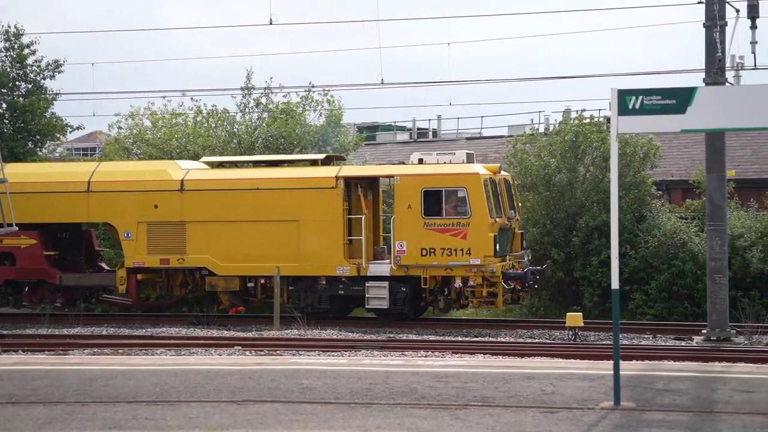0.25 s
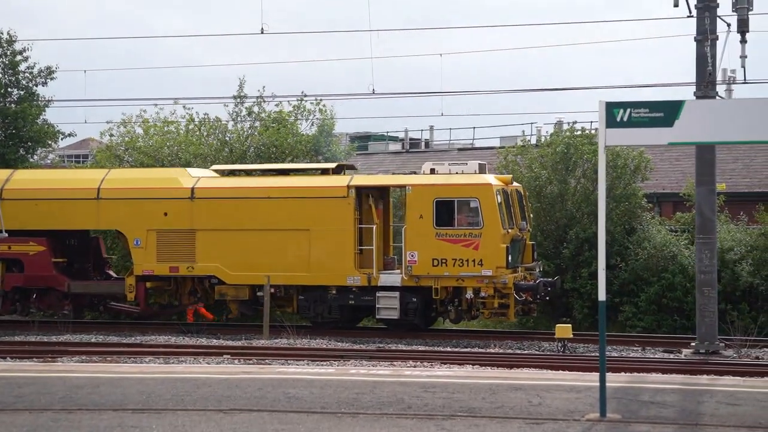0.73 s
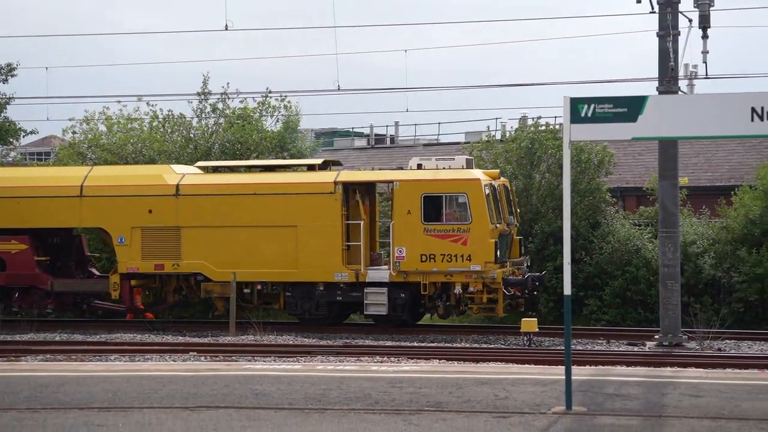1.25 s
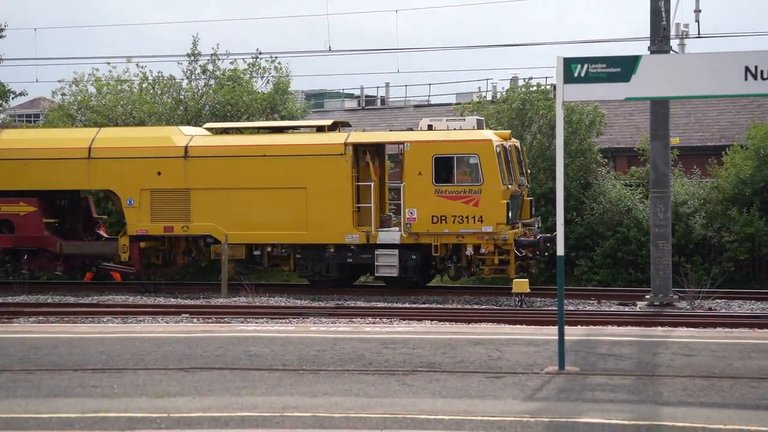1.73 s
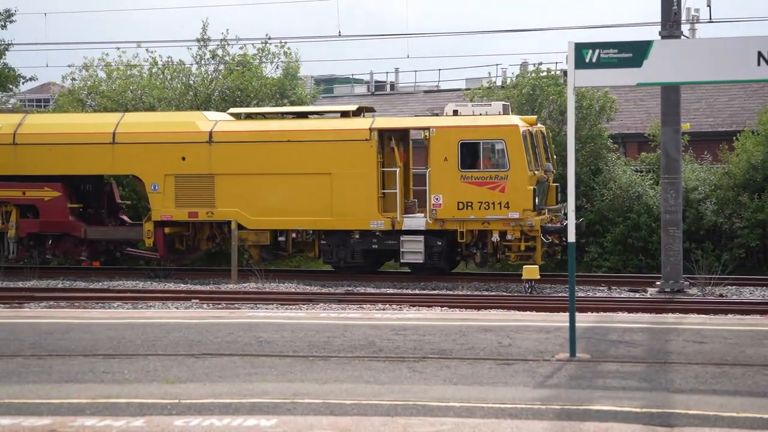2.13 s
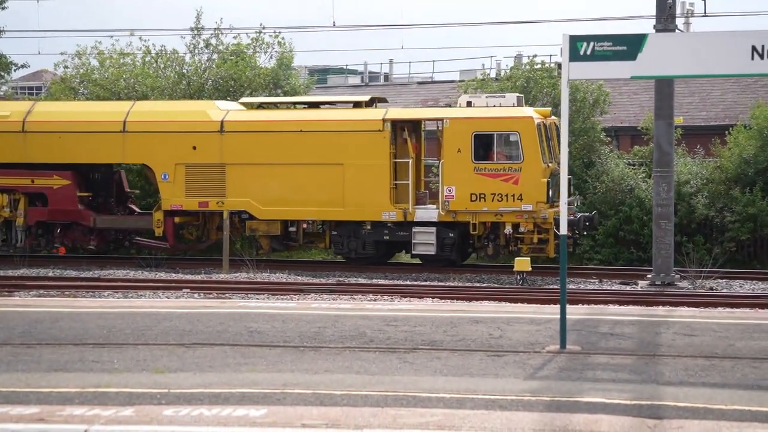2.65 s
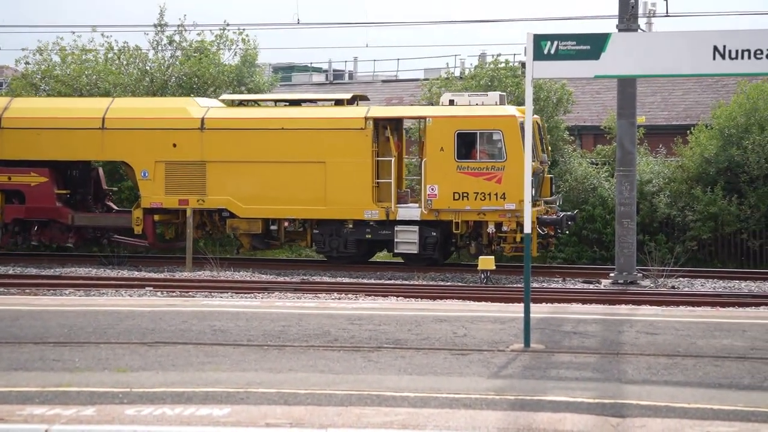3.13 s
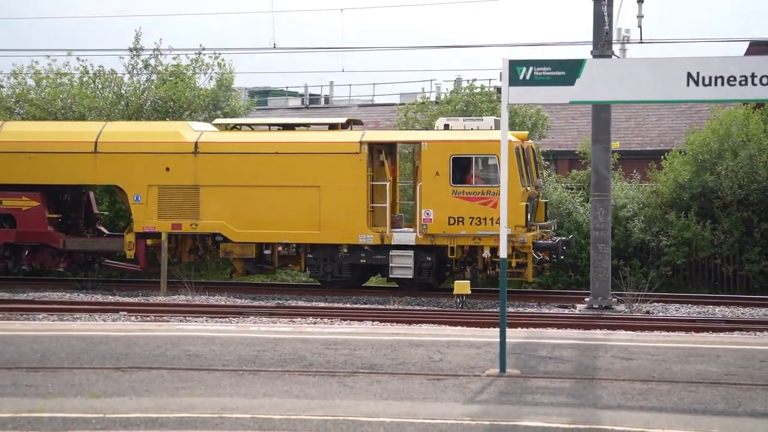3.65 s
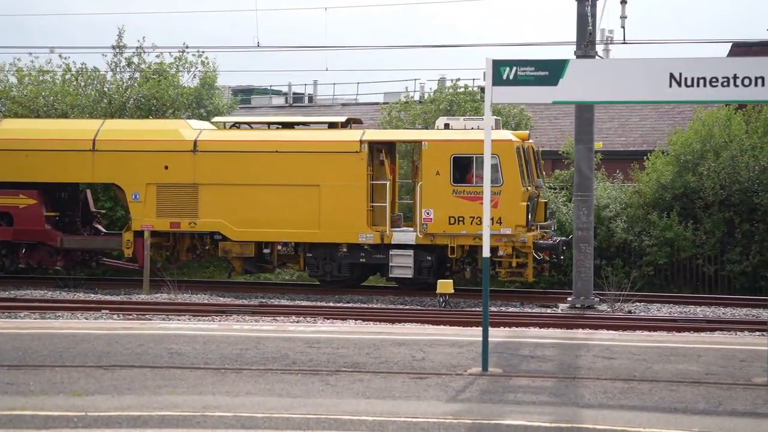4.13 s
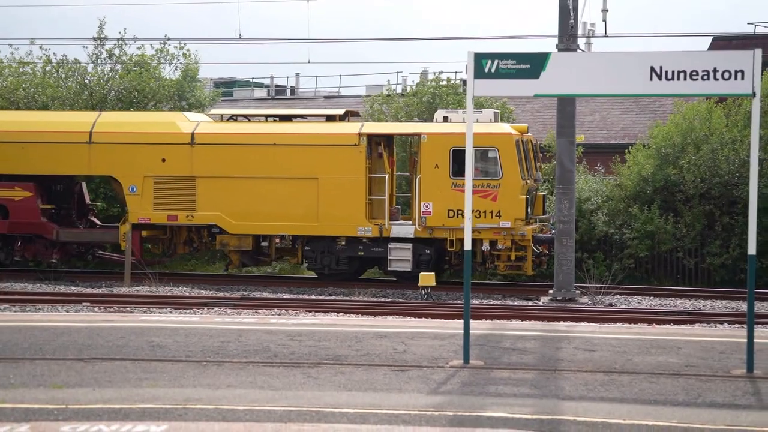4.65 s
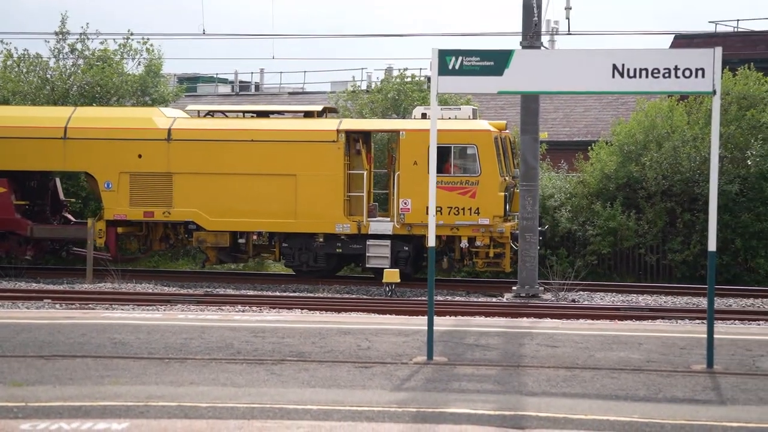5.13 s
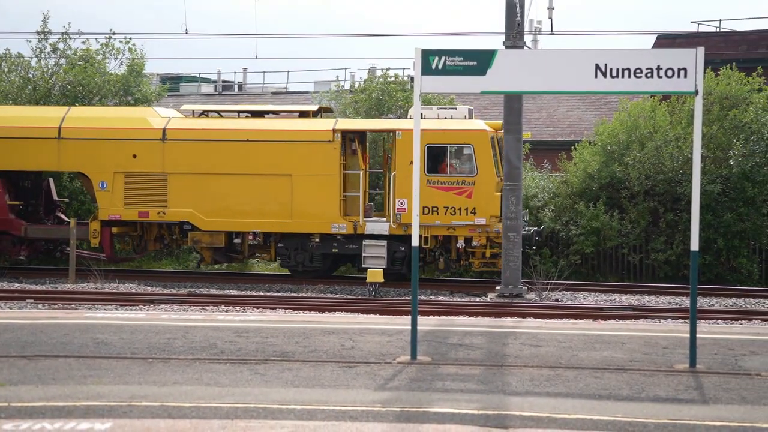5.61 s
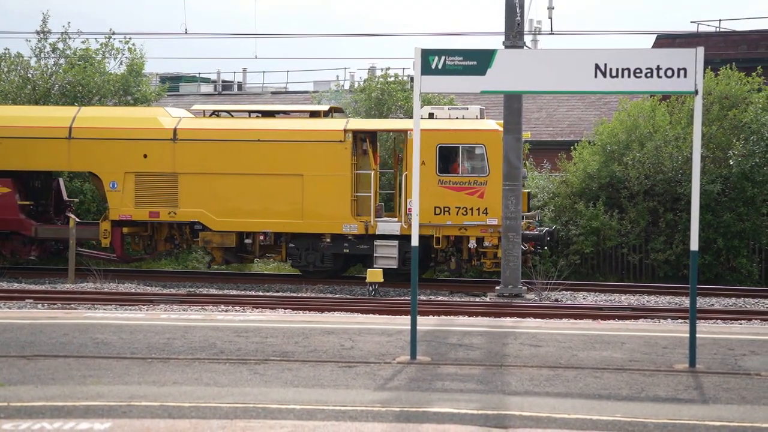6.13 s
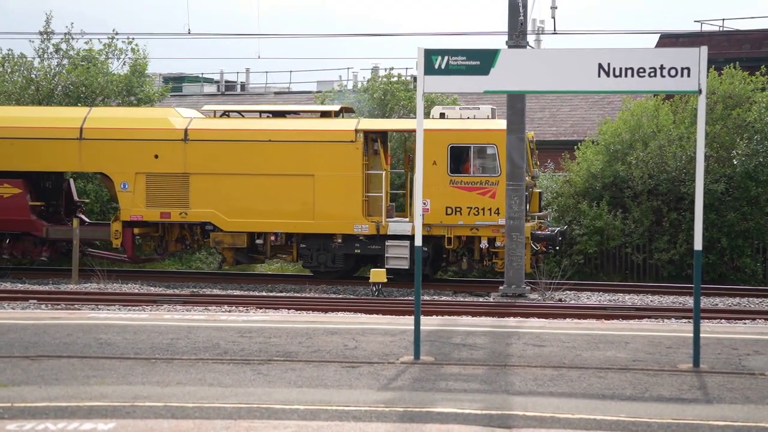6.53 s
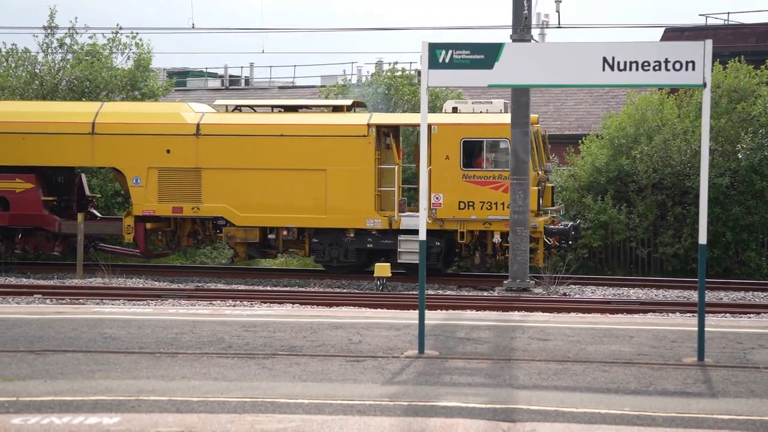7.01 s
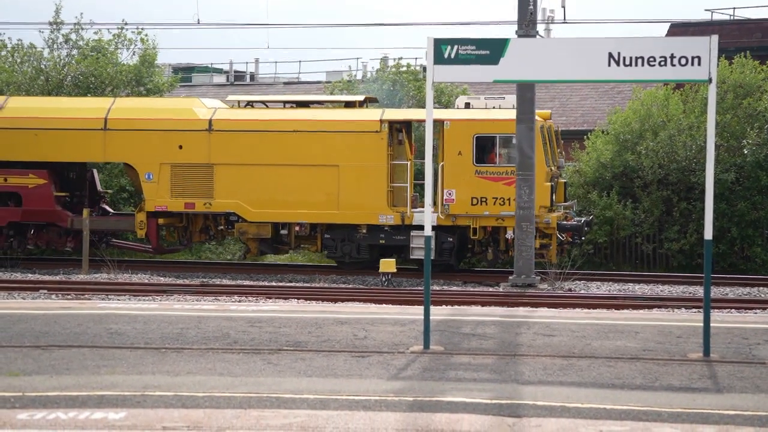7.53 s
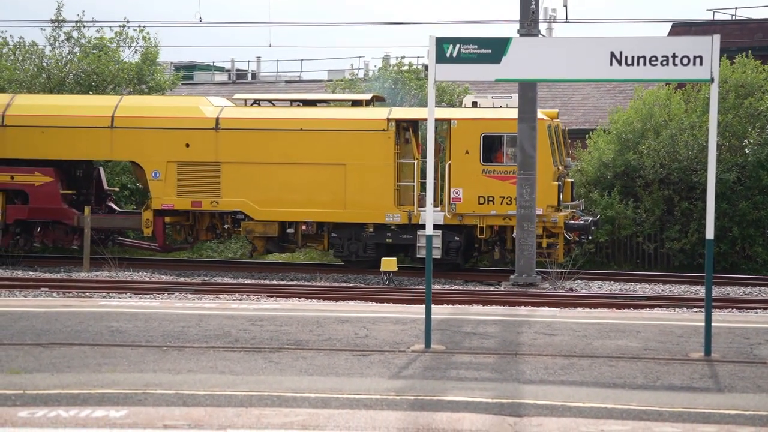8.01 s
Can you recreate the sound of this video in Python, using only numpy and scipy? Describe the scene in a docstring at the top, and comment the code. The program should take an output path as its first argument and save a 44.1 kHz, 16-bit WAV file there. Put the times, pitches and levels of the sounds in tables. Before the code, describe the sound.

A steady, throbbing diesel drone with broad roar and light fan hiss fills a wide stereo image. High metallic wheel squeals flutter and glide over it, mostly left of centre. A bright latch click is followed by a small coupling clank and a double pneumatic hiss; then piercing, ringing squeals and rough flange chatter become busier until the end. Small recorder on an open platform, brief diffuse reflections.

```python
"""A diesel rail maintenance machine creeps past a platform, a few tracks from a small stereo recorder.
From the start two engines drone as summed crank orders over noise-band roar, fan hiss and mains hum;
wavering stick-slip tones squeal from the first moment, with filtered-noise scrapes. A latch ticks and a coupling
clanks (damped modes), then an air valve blows off twice (shaped noise). Later, resonant chatter joins
the denser squeals. The station returns a short, noise-like echo of wheels, valve and knocks."""
import sys
import numpy as np
from scipy import signal
from scipy.fft import rfft, irfft, next_fast_len
from scipy.io import wavfile
from scipy.ndimage import uniform_filter1d

SR = 44100
rng = np.random.default_rng(int(sys.argv[2]) if len(sys.argv) > 2 else 0)


def file_out(sig):
    """Save sig as 16-bit WAV at sys.argv[1]."""
    # one column per channel
    cols = np.atleast_2d(sig).T
    # limit, then scale
    lim = np.clip(cols, -1, 1)
    pcm = np.round(lim * 32767).astype(np.int16)
    wavfile.write(sys.argv[1], SR, pcm)


N = 364707

# Crank orders of each engine, before the approach gain: multiple_of_cycle_rate, level_db
SLOW_ENGINE_ORDERS = [(4, -61), (6, -50), (14, -53), (15, -55.5), (16, -48), (19, -56), (21, -53),
                      (22, -54), (24, -45.5), (26, -50), (32, -47.5), (61, -55), (73, -51.5), (79, -51),
                      (80, -58)]
FAST_ENGINE_ORDERS = [(6, -46.5), (9, -48), (10, -53), (11, -56), (13, -54), (14, -61), (24, -63),
                      (26, -51.5), (28, -50.5), (30, -60), (34, -55), (35, -51), (36, -56.5), (42, -55.5),
                      (45, -60.5), (51, -49), (52, -65), (56, -48.5), (57, -48.5), (60, -44), (63, -63),
                      (64, -47), (66, -46.5), (80, -49.5), (81, -60.5), (82, -55), (84, -64), (87, -62),
                      (90, -51.5)]
SLOW_CYCLE_HZ, FAST_CYCLE_HZ = 6.7465, 15.8605
# Slow-engine casing, before its ring is set to one level: multiple_of_cycle_rate, relative_db
CASING_ORDERS = [(46, -6.5), (47, -10.5), (48, 4), (49, -3), (50, 3), (51, -9.5), (52, -6), (53, -18),
                 (55, -18)]
CASING_START, CASING_SWEEP = .15, .06  # cycles per order, cycles per order squared
# Engine tones swelling with load: time_s, slow_firing_db, fast_firing_db, casing_ring_db
FIRING_LEVELS = [(0.0, -44, -49, -41), (0.09, -43, -42, -38.5), (0.85, -43, -40, -35),
                 (1.77, -38.5, -35.5, -34.5), (3.25, -45, -37, -37.5), (3.38, -37, -40, -35),
                 (3.48, -42, -32.5, -37.5), (4.03, -39, -37.5, -34.5), (4.33, -39.5, -35.5, -39),
                 (5.62, -39, -36.5, -36.5), (6.54, -40, -34, -42), (7.69, -41, -34.5, -37),
                 (8.18, -41, -35, -39), (8.27, -41, -42, -40)]
# Engine gains as the machine draws level: time_s, drone_db, roar_db
APPROACH = [(0, -5, -3.5), (.6, 1, -2), (1.5, 0, 0), (2.5, -1.5, 1), (3.5, 0, 0.5), (4.5, 1, 0),
            (5.5, 0.5, 0.5), (6.5, 0.5, 1), (7.5, 1, 1.5), (8.27, -1, 1)]
# Steady mains hum: pitch_hz, level_db
MAINS_HUM = (100, -47)
# Relative colour of exhaust, fans and casing: frequency_hz, density_db_per_hz
ROAR_COLOUR = [(30, -17), (75, -10), (140, -11), (200, -7.5), (250, -9), (331, -3.5), (450, -10),
               (631, -13.5), (997, -7.5), (1300, -11.5), (1700, -17), (2920, -17.5), (6050, -24),
               (9300, -32), (12500, -64.5), (15500, -54)]
ROAR_DB = -30  # before the approach gain
# Stereo width of engines, scrape: frequency_hz, side_minus_mid_db
ROAR_SIDE = [(40, -66), (90, -73), (180, -73), (380, -22.5), (700, -9.5), (1290, -8.5), (2380, 0.5),
             (4400, -1), (8120, -0.5), (15000, 7.5)]
LEAST_SIDE_DB = -32  # floor on side levels: the bass stays nearly mono
# Thin hiss of the cooling fans, before its flicker: time_s, level_db
FAN_HISS = [(0, -61), (1.2, -54), (1.7, -50.5), (2.7, -49), (3.5, -54), (4.5, -56), (6.4, -52), (7, -51),
            (8.27, -52)]

# Metal knocks, centre of each mode cluster, before panning: start_s, nominal_peak_db, pitch_hz, t60_s
KNOCKS = [(1.6534, -6.5, 3270, 0.014), (1.6575, -17, 3400, .01), (2.113, -18.5, 1080, 0.16)]

# Air valve blasts: start_s, hold_s, level_db
VALVE_BLASTS = [(2.765, 0.14, -17.5), (3.075, .16, -17.5)]
BLAST_OPEN_S, BLAST_SHUT_T60_S, BLAST_TAIL_DB, BLAST_TAIL_T60_S = 0.04, 0.19, -7.5, 0.58
# Relative colour of the air jet: frequency_hz, density_db_per_hz
JET_COLOUR = [(400, -40), (700, -12.5), (990, -8), (1500, -12.5), (1900, -12.5), (2200, -5), (3100, -9.5),
              (5000, -12.5), (8800, -17), (15500, -30.5)]
# Resonances of the valve's pipe: pitch_hz, width_hz, relative_db
VALVE_PIPE = [(1216, 40, 13), (1547, 65, 7.5), (2730, 200, -9), (3110, 63, 6.5), (3640, 91, 2)]
# Stereo width of the jet: frequency_hz, side_minus_mid_db
JET_SIDE = [(60, -39), (110, -37), (200, -30), (380, -26), (700, -23), (1290, -9), (2380, -2.5),
            (4400, -14), (8120, -2.5), (15000, -4)]

# Flange chatter, before panning: start_s, hold_s, level_db
CHATTER_BURSTS = [(4.222, .1, -36.5), (4.345, .03, -39), (4.435, .07, -36), (4.56, .22, -47)]
CHATTER_ATTACK_S, CHATTER_T60_S = .012, 0.23
# Broad wheel modes shaken by the chatter: pitch_hz, width_hz, relative_db
CHATTER_MODES = [(3870, 160, -2), (4180, 90, 3), (4340, 65, -3), (4520, 140, -7), (5030, 130, 1.5)]
# Gritty scrapes of flange on rail: start_s, hold_s, level_db
SCRAPE_BURSTS = [(.02, 0.024, -39.5), (.355, .01, -43), (4.21, 0.11, -39), (4.42, 0.37, -42),
                 (4.9, 0.47, -47.5), (5.7, .15, -50), (5.87, .03, -42), (6.03, .05, -44), (6.12, .15, -51),
                 (7.45, .17, -43.5)]
SCRAPE_ATTACK_S, SCRAPE_T60_S = 0.023, 0.24
# Relative colour of the scrape: frequency_hz, density_db_per_hz
SCRAPE_COLOUR = [(2500, -14), (4000, 3), (6500, 19.5), (9000, 14.5), (13500, 3.5), (16000, -20)]

# Squeal tones, with a faint 10.9 kHz sum tone of two squeals:
# pitch_hz, left_minus_right_db, left_lead_rad, flutter_db, pitch_waver_share
SQUEAL_TONES = [(2430, 10, 4, -2, .0034), (2810, 9, 4, 2, .0062), (2980, 6, 4, 5, 0.0026),
                (3110, 4, 4, 1, 0.002), (3240, 11, 4.5, 7, 0.0014), (3330, 6.5, 2, 3, 0.00163),
                (3454, 9.5, -3, 6, 0.0027), (3630, 6, 1, 6, 0.0028), (3790, 8, 1.5, 4, 0.0017),
                (3850, 9, -2, 8, 0.0027), (4070, 14, -1.5, -1, .001), (5080, 17, 0, 1, .002),
                (5880, 4, 0.1, 4.5, 0.0019), (6080, 0, 0.48, 2, 0.00018), (10910, 5, -2, 7, .0024)]
# Short squeals, one row a grip, before flutter:
# start_s, length_s, rise_s, pitch_hz, glide_hz, reference_peak_db, octave_re_tone_db
GRIPS = [(0.0, 0.021, 0.0055, 3470, -26, -31.5, -33), (0.0, 0.11, 0.057, 5890, -20, -20, -31),
         (0.02, 0.09, 0.05, 5080, 0, -45, -25), (0.054, 0.057, 0.018, 3540, -3, -38, -17),
         (0.081, 0.051, 0.027, 3150, -53, -37, -35), (0.131, 0.14, 0.02, 5920, -3, -43, -32),
         (0.144, 0.038, 0.009, 3470, 36, -32, -10), (0.2, 0.09, 0.02, 3540, 0, -44, -20),
         (0.245, 0.078, 0.069, 3050, -14, -36.5, -6), (0.32, 0.067, 0.085, 5860, -60, -17.5, -36),
         (0.398, 0.081, 0.018, 5836, 25, -23, -34), (0.485, 0.051, 0.033, 5810, -70, -26.5, -29),
         (0.536, 0.055, 0.009, 5900, -7, -31.5, -35), (0.742, 0.037, 0.021, 3450, 35, -33, -35),
         (0.79, 0.12, 0.03, 3465, 2, -43, -25), (0.814, 0.11, 0.018, 3130, 60, -38, -17),
         (1.81, 0.064, 0.019, 3295, 10, -38, -18), (1.89, 0.059, 0.02, 3470, -19, -38, -16),
         (1.96, 0.07, 0.03, 3250, 2, -42, -20), (1.97, 0.054, 0.03, 3400, 0, -43, -20),
         (2.407, 0.11, 0.042, 3560, -31, -28, -35), (2.52, 0.031, 0.015, 3570, 1, -36, -35),
         (2.74, 0.058, 0.05, 3160, 0, -33, -9), (3.433, 0.083, 0.035, 3600, 9, -34.5, -35),
         (3.553, 0.084, 0.077, 3580, 8, -23, -38), (3.64, 0.027, 0.015, 3600, 17, -26, -35),
         (3.675, 0.04, 0.017, 3110, 23, -29, -21), (3.79, 0.06, 0.025, 3040, 40, -30, -18),
         (3.97, 0.067, 0.054, 5900, 0, -39, -32), (4.023, 0.085, 0.082, 5840, -3, -26.5, -27),
         (4.116, 0.071, 0.036, 5869, -2, -23, -25), (4.22, 0.039, 0.012, 5860, -7, -20, -16),
         (4.243, 0.08, 0.05, 5090, 0, -42, -25), (4.247, 0.035, 0.015, 3400, 0, -34, -20),
         (4.259, 0.037, 0.012, 5870, 11, -19.5, -20), (4.304, 0.042, 0.018, 5857, -2, -25, -17),
         (4.331, 0.046, 0.024, 5095, 20, -38, -17), (4.346, 0.015, 0.009, 5863, 49, -21, -20),
         (4.37, 0.12, 0.14, 5868, -10, -17, -21), (4.421, 0.12, 0.024, 5095, 4, -36, -25),
         (4.502, 0.099, 0.021, 5868, 38, -16.5, -22), (4.539, 0.11, 0.05, 5090, 0, -42, -25),
         (4.613, 0.026, 0.015, 5862, -15, -22, -22), (4.642, 0.096, 0.024, 5875, -7.5, -19, -16.5),
         (4.645, 0.052, 0.014, 3640, -100, -33, -18), (4.666, 0.084, 0.06, 5087, -28, -38, -35),
         (4.72, 0.1, 0.057, 5860, -1, -16.5, -20), (4.76, 0.12, 0.03, 5088, 2, -43, -25),
         (4.84, 0.028, 0.02, 5868, -42, -28, -25), (4.85, 0.05, 0.015, 3660, -5, -37, -20),
         (4.873, 0.06, 0.011, 5869, 20, -24, -20), (4.957, 0.049, 0.052, 5890, 11, -18.5, -23),
         (5.023, 0.037, 0.023, 5870, 19, -23, -30), (5.067, 0.023, 0.013, 5876, -49, -25, -34),
         (5.094, 0.087, 0.045, 5878, 30, -24, -33), (5.2, 0.055, 0.01, 3240, 0, -37, 7),
         (5.235, 0.042, 0.016, 5980, -31, -27.5, -18), (5.268, 0.056, 0.048, 3248, -36, -36, -3),
         (5.28, 0.02, 0.0096, 5880, 4, -14, -25), (5.295, 0.06, 0.046, 3445, 13, -22, -20),
         (5.328, 0.045, 0.012, 5914, 6, -41, -27), (5.531, 0.085, 0.036, 5910, -21, -20.5, -29),
         (5.627, 0.039, 0.021, 5927, -29, -26.5, -26), (5.69, 0.11, 0.099, 5930, -27, -26, -30),
         (5.705, 0.032, 0.012, 3850, -59, -24.5, -8.5), (5.771, 0.04, 0.01, 3840, 29, -20, -15),
         (5.834, 0.058, 0.042, 5930, 23, -21.5, -19), (5.855, 0.026, 0.012, 3840, 30, -29.5, -6),
         (5.86, 0.08, 0.02, 5050, 0, -41, -18), (5.897, 0.048, 0.021, 5930, 68, -23, -11),
         (5.912, 0.057, 0.015, 3844, 37, -24.5, -16), (5.939, 0.094, 0.023, 5972, -89, -27, -16),
         (5.962, 0.1, 0.047, 3840, -32, -25.5, -10), (5.968, 0.039, 0.027, 3624, -3, -35, -35),
         (6.001, 0.13, 0.04, 3430, 0, -39, -20), (6.028, 0.021, 0.015, 5950, -59, -29, -27),
         (6.052, 0.04, 0.036, 5919, 39, -24.5, -20), (6.067, 0.039, 0.018, 3844, 22, -27.5, -20),
         (6.1, 0.022, 0.023, 5940, -41, -23, -27), (6.139, 0.063, 0.061, 3851, 2, -34, -15),
         (6.148, 0.021, 0.018, 6000, 41, -27.5, -22), (6.19, 0.027, 0.013, 3670, -14, -32, -14),
         (6.21, 0.28, 0.05, 3850, 2, -38.5, -18), (6.217, 0.028, 0.009, 3510, 25, -33, -16),
         (6.229, 0.034, 0.003, 5990, -12, -30, -21), (6.229, 0.048, 0.011, 3449, 10, -26.5, -13),
         (6.27, 0.086, 0.06, 3350, -62, -35, -21), (6.465, 0.079, 0.0085, 3393, -1, -24.5, -8.5),
         (6.534, 0.017, 0.009, 3430, -67, -26, -15), (6.573, 0.07, 0.023, 3427, -71, -26.5, -12),
         (6.6, 0.029, 0.015, 3320, -150, -28, -3), (6.615, 0.11, 0.09, 3240, -22, -24, -4.5),
         (6.75, 0.12, 0.061, 3234, -19, -20.5, -6), (6.848, 0.027, 0.009, 2810, 63, -27, -15),
         (6.869, 0.12, 0.05, 3230, 22, -24, -5), (6.87, 0.035, 0.013, 2430, 0, -40, -18),
         (6.884, 0.03, 0.011, 2802, -62, -30, -13), (6.998, 0.063, 0.015, 3232, -9, -33, -5),
         (7.013, 0.091, 0.011, 3459, 0, -24, -17), (7.154, 0.045, 0.031, 3456, 1, -25, -17),
         (7.208, 0.025, 0.012, 3466, -26, -33, -15), (7.36, 0.069, 0.009, 3730, 103, -35, -24),
         (7.465, 0.071, 0.071, 3730, -31, -20, -33), (7.552, 0.1, 0.065, 3667, -12, -16, -19),
         (7.672, 0.068, 0.04, 3678, -14, -32.5, -9), (7.741, 0.1, 0.03, 3680, 0, -38, -12),
         (7.914, 0.174, 0.078, 4068, -30, -36, -35), (8.159, 0.12, 0.089, 4082, 2, -31, -37),
         (8.171, 0.1, 0.051, 3864, 2, -28, -24)]
GRIP_START_DB, GRIP_END_DB, GRIP_BEND = -6.5, -8.5, 1.85  # re peak, re peak, roundness of the swell
RING_OUT_S, RING_OUT_DB = 0.038, -7.5  # the wheel rings on after a grip; extra fall
# Long squeals and the sum tone, one curve each, before flutter and waver: time_s, pitch_hz, level_db
LONG_SQUEALS = [
    [(0.33, 3046, -47), (0.394, 2992, -30.5), (0.592, 2984, -34), (0.776, 3019, -30), (0.79, 2989, -42),
     (0.826, 3039, -31.5), (0.928, 3031, -35), (0.948, 3021, -26), (1.114, 2979, -32.5), (1.166, 3010, -42),
     (1.206, 2920, -37), (1.222, 2970, -45), (1.308, 2956, -33.5), (1.348, 2949, -46), (1.526, 2988, -32.5),
     (1.56, 2922, -54), (1.596, 2962, -31), (1.616, 2940, -36.5), (1.814, 2995, -31), (1.83, 2942, -40),
     (1.854, 2983, -23), (1.886, 2970, -41), (1.942, 2980, -28), (2.052, 3030, -50), (2.078, 3050, -34),
     (2.15, 3000, -48)],
    [(3.38, 2975, -48), (3.414, 2875, -43), (3.554, 2897, -39), (3.574, 2890, -55), (3.606, 2923, -38),
     (3.8, 2995, -32)],
    [(3.8, 3057, -36), (3.906, 3177, -39), (3.922, 3281, -39), (3.996, 3225, -38), (4.088, 3308, -49),
     (4.186, 3227, -33.5), (4.368, 3324, -44), (4.384, 3295, -31.5), (4.434, 3291, -45), (4.516, 3282, -31),
     (4.678, 3272, -46), (4.718, 3313, -39), (4.9, 3306, -49)],
    [(5.04, 3634, -46), (5.06, 3644, -30), (5.074, 3505, -41), (5.09, 3452, -28), (5.11, 3402, -20.5),
     (5.122, 3360, -31), (5.144, 3240, -23.5), (5.22, 3225, -39)],
    [(5.365, 3447, -51), (5.371, 3482, -42), (5.419, 3443, -24), (5.429, 3370, -39), (5.449, 3259, -26),
     (5.479, 3335, -30), (5.491, 3522, -37), (5.507, 3602, -25), (5.56, 3731, -50)],
    [(7.25, 3410, -39), (7.582, 3390, -36), (7.612, 3384, -50), (7.814, 3335, -34.5), (7.86, 3324, -44),
     (7.98, 3308, -33.5), (8.022, 3310, -50), (8.038, 3320, -38), (8.27, 3296, -36)],
    [(6.14, 6100, -52), (6.19, 6050, -24), (6.26, 6070, -36), (6.47, 6082, -36), (6.64, 6070, -24),
     (7.05, 6084, -24), (7.24, 6083, -19.5), (7.36, 6083, -22.5), (7.38, 6084, -28), (7.53, 6085, -24),
     (7.57, 6082, -30), (7.83, 6083, -31), (8.21, 6084, -21), (8.27, 6083, -16)],
    [(4.22, 10900, -44), (4.5, 10910, -49), (4.84, 10930, -58)],
]
# Octave of each of these curves, before its flicker: octave_re_tone_db
LONG_OCTAVE_DB = [-12.5, -17, -3.5, -7, -11.5, -11, -41, -45]
LET_GO_S, THIRD_DB = .008, -14.5  # fade at both ends; third partial re octave

ECHO_T60_S, ECHO_DB = .55, -13
RIGHT_LAG_S = 9 / SR  # full lag of the right channel
TOP_HZ = 15740  # upper limit of the recorder


def undb(db):
    """Turn decibels into an amplitude factor."""
    return 10 ** (np.asarray(db) / 20)


def level(x, db):
    """Set the rms level over all samples."""
    return x * undb(db) / np.sqrt(np.mean(x ** 2))


def on_hz(table, hz):
    """Read a frequency table on a log-frequency axis."""
    table_hz, values = np.transpose(table)
    return np.interp(np.log(hz + 1), np.log(table_hz), values)


def over_time(table):
    """Read each column of a time table at every sample."""
    s, *columns = np.transpose(table)
    return [np.interp(np.arange(N) / SR, s, column) for column in columns]


def colour(x, table):
    """Filter by a table of frequency and decibels."""
    size = next_fast_len(len(x))
    gain = undb(on_hz(table, np.fft.rfftfreq(size, 1 / SR)))
    return irfft(rfft(x, size) * gain, size)[:len(x)]


def walk(rate, size=N):
    """Random values held 1 / rate seconds and slewed twice; spread near 1."""
    hold = int(SR / rate)
    steps = np.repeat(rng.standard_normal(size // hold + 1), hold)
    return 1.28 * uniform_filter1d(uniform_filter1d(steps, hold), hold)[:size]


def decay(t, t60_s):
    """Exponential fall by 60 dB in t60_s."""
    return np.exp(-np.log(1000) * t / t60_s)


def bursts(rows, attack_s, t60_s):
    """Summed gain of timed bursts: smooth attack, hold, exponential release."""
    t, gain = np.arange(N) / SR, 0
    for start, hold, db in rows:
        late = np.maximum(t - start - attack_s - hold, 0)
        attack = np.clip((t - start) / attack_s, 0, 1) ** 2
        gain = gain + undb(db) * attack * decay(late, t60_s)
    return gain


def resonances(x, modes):
    """Ring damped modes of pitch, width and gain with one input."""
    return sum(undb(db) * signal.lfilter(*signal.iirpeak(hz, hz / width, SR), x) for hz, width, db in modes)


def pair(mid, other, side_table, lean):
    """Left and right from mid plus side; the side shares the part lean with the mid."""
    table = [(hz, max(db, LEAST_SIDE_DB)) for hz, db in side_table]
    side = colour(lean * mid + np.sqrt(1 - lean ** 2) * other, table)
    return np.array([mid + side, mid - side])


def lag_right(x):
    """The right channel lags the left, rising from none at 400 Hz to full at 1900 Hz."""
    size = next_fast_len(N)
    hz = np.fft.rfftfreq(size, 1 / SR)
    lag = RIGHT_LAG_S * np.clip((hz - 400) / 1500, 0, 1)
    right = irfft(rfft(x[1], size) * np.exp(-2j * np.pi * hz * lag), size)[:N]
    return np.array([x[0], right])


def fan_hiss():
    """Fans: smooth, slowly flickering noise above the engine roar, nearer the left."""
    noise = colour(rng.standard_normal(N), [(5000, -30), (9000, -20), (12000, 13), (16000, -6)])
    hiss_db, = over_time(FAN_HISS)
    return level(noise, 0) * undb(hiss_db + 1.5 * walk(5.2)) * np.array([[1.2], [.8]])


def roar(turn):
    """Engine noise in overlapping octave-spaced bands that flicker alone and throb with the slow firings."""
    size = next_fast_len(N)
    hz = np.fft.rfftfreq(size, 1 / SR)
    noise = rfft(rng.standard_normal((2, size))) * undb(on_hz(ROAR_COLOUR, hz))
    throb = 1 + 0.1 * np.cos(2 * np.pi * 8 * turn) + 0.018 * np.cos(2 * np.pi * turn)
    out = 0
    for octave in np.arange(4, 14.5):
        share = np.cos(np.pi / 2 * np.clip(np.log2(hz + 1) - octave, -1, 1)) ** 2
        flicker_db = walk(8) + 1.15 * walk(0.67)
        out = out + irfft(noise * share, size)[:, :N] * undb(flicker_db)
    return level(out * throb, ROAR_DB)


def drone(cycle_hz, orders, firing_order, firing_db, wobble_db, drift):
    """Orders swell alone on one slightly unsteady crank; gives crank turns and complex tones."""
    turn = np.cumsum(cycle_hz * (1 + drift * walk(1.484))) / SR
    tones = np.sqrt(2) * undb(firing_db) * np.exp(2j * np.pi * firing_order * turn)
    for order, db in orders:
        swell = np.sqrt(2) * undb(db + wobble_db * walk(2.96))
        tones = tones + swell * np.exp(2j * np.pi * (order * turn + rng.random()))
    return turn, tones


def casing(turn):
    """Orders in step throb once a cycle; higher ones come later, so each throb glides up. Rms 1."""
    out = 0
    for order, db in CASING_ORDERS:
        start = CASING_START * order + CASING_SWEEP * (order - 49) ** 2
        cycles = order * turn - start + 0.058 * walk(3.01)
        out = out + undb(db + 1.6 * walk(3.98)) * np.exp(2j * np.pi * cycles)
    return out / out.real.std()


def engines():
    """Both engines and the hum; the engine gains follow the machine as it draws level."""
    drone_db, roar_db = over_time(APPROACH)
    # the approach gain is taken off here since the load curves already hold the final levels
    slow_db, fast_db, ring_db = (db - drone_db for db in over_time(FIRING_LEVELS))
    turn, slow = drone(SLOW_CYCLE_HZ, SLOW_ENGINE_ORDERS, 8, slow_db, 1.5, .0006)
    _, fast = drone(FAST_CYCLE_HZ, FAST_ENGINE_ORDERS, 12, fast_db, 2.2, .0004)
    tones = undb(drone_db) * (slow + fast + undb(ring_db) * casing(turn))
    hum_hz, hum_db = MAINS_HUM
    hum = np.sqrt(2) * undb(hum_db) * np.sin(2 * np.pi * hum_hz * np.arange(N) / SR)
    mid, other = roar(turn) * undb(roar_db)
    # the quarter-turned tones widen the stereo image
    return pair(tones.real + hum + mid, tones.imag + other, ROAR_SIDE, 0.38)


def knocks():
    """Latch and coupling: each knock rings a close cluster of damped modes after a soft contact."""
    out, t = np.zeros(N), np.arange(SR // 4) / SR
    for start, db, hz, t60 in KNOCKS:
        ring = sum(np.sin(2 * np.pi * hz * ratio * t) for ratio in (.9, 1, 1.04, 1.15)) / 3
        contact = 1 - np.exp(-(t * hz / 2) ** 2)
        first = int(start * SR)
        out[first:first + len(t)] += undb(db) * ring * contact * decay(t, t60)
    return out * np.array([[1.2], [.8]])


def valve():
    """A turbulent jet sings a little in the valve's pipe; a weaker sigh lingers after it shuts."""
    jets = []
    for noise in rng.standard_normal((2, N)):
        jet = colour(noise * undb(0.46 * walk(150)), JET_COLOUR)
        jets.append(level(jet + resonances(jet, VALVE_PIPE), 0))
    blast = bursts(VALVE_BLASTS, BLAST_OPEN_S, BLAST_SHUT_T60_S)
    sigh = undb(BLAST_TAIL_DB) * bursts(VALVE_BLASTS, BLAST_OPEN_S, BLAST_TAIL_T60_S)
    gain = np.maximum(blast, sigh)
    return pair(gain * jets[0], gain * jets[1], JET_SIDE, -0.29)


def chatter():
    """Irregular slips, as uneven noise, shake several damped wheel modes at once."""
    slips = rng.standard_normal(N) * undb(2.5 * walk(120))
    rings = level(resonances(slips, CHATTER_MODES), 0)
    return bursts(CHATTER_BURSTS, CHATTER_ATTACK_S, CHATTER_T60_S) * rings * np.array([[1.25], [.75]])


def scrape():
    """Grainy broadband friction of flange on rail, in timed bursts."""
    grit = rng.standard_normal((2, N)) * undb(2.8 * walk(80))
    mid, other = (level(colour(g, SCRAPE_COLOUR), 0) for g in grit)
    gain = bursts(SCRAPE_BURSTS, SCRAPE_ATTACK_S, SCRAPE_T60_S)
    return pair(gain * mid, gain * other, ROAR_SIDE, 0.23)


def grip_curve(start, length, rise, hz, glide_hz, db):
    """A grip swells to its peak and sags while the pitch glides, then rings out."""
    part = np.linspace(0, 1, 5)
    rise = np.clip(rise, .002, length - .002)
    s = np.r_[-LET_GO_S, rise * part[:-1], rise + (length - rise) * part, length + RING_OUT_S]
    away_from_peak = np.r_[1, part[:0:-1], part, 1] ** GRIP_BEND
    swell_db = away_from_peak * np.where(s < rise, GRIP_START_DB, GRIP_END_DB)
    swell_db = swell_db + RING_OUT_DB * (s > length)
    pitch = hz + glide_hz * (np.clip(s / length, 0, 1) - .5)
    return np.transpose([start + s, pitch, db + swell_db])


def span(rows, fade_s):
    """Sample range, pitch and level columns, and a soft-ended gate for one squeal curve."""
    s, *columns = np.transpose(rows)
    i = np.arange(max(int(s[0] * SR), 0), min(int(s[-1] * SR), N))
    # no fade where the squeal meets the start or end of the scene
    from_start = i - i[0] + N * (i[0] == 0)
    to_end = i[-1] - i + N * (i[-1] > N - 400)
    gate = np.clip(np.minimum(from_start, to_end) / (fade_s * SR), 0, 1)
    return i, [np.interp(i / SR, s, column) for column in columns], gate


def squeals():
    """Stick-slip squeals and their faint sum tone: wavering tones with octave and third that flutter."""
    out, tones = np.zeros((2, N)), np.array(SQUEAL_TONES)
    curves = list(zip(LONG_SQUEALS, LONG_OCTAVE_DB))
    curves += [(grip_curve(*row[:-1]), row[-1]) for row in GRIPS]
    for rows, octave_db in curves:
        i, (hz, db), gate = span(rows, LET_GO_S)
        # the pitch late in the squeal picks the nearest row of settings
        nearest = np.argmin(abs(tones[:, 0] - hz[-len(hz) // 8]))
        _, pan_db, lead, flutter_db, waver = tones[nearest]
        wavering_hz = hz * (1 + waver * walk(120.9, size=len(i)))
        phase = 2 * np.pi * (np.cumsum(wavering_hz) / SR + rng.random())
        # one-sided flutter: positive settings only drop the level, negative ones only lift it
        flutter = flutter_db * np.minimum(walk(100, size=len(i)), 0)
        grip = np.sqrt(2) * gate * undb(db + flutter)
        # gains and phases of the two channels keep their sum at twice the tone's level
        ends = undb(np.array([pan_db, -pan_db]) / 2) * np.exp(.5j * np.array([lead, -lead]))
        ends = 2 * ends / abs(ends.sum())
        tone = (ends[:, None] * np.exp(1j * phase)).real
        third = undb(THIRD_DB) * np.cos(3 * phase) * (3 * hz < TOP_HZ)
        upper = (np.cos(2 * phase) + third) * (2 * hz < TOP_HZ)
        upper = upper * undb(octave_db + 2 * walk(25, size=len(i)))
        out[:, i] += grip * (tone + upper * np.array([[1.4], [.6]]))
    return out


def echo(close):
    """Platform and walls return a decaying noise tail after a 12 ms gap."""
    t = np.arange(SR) / SR
    tail = rng.standard_normal((2, SR)) * decay(t, ECHO_T60_S) * (t > .012)
    tail *= undb(ECHO_DB) / np.sqrt(np.sum(tail ** 2, axis=1, keepdims=True))
    return signal.fftconvolve(close, tail, axes=1)[:, :N]


def scene():
    """Engines and fans, plus wheels, valve and knocks with their echo off platform and walls."""
    background = lag_right(engines() + fan_hiss())
    close = knocks() + valve() + lag_right(chatter() + scrape()) + squeals()
    return background + close + echo(close)


def record(dry):
    """The recorder cuts the top with a steep low-pass filter."""
    return signal.sosfilt(signal.ellip(16, .3, 80, TOP_HZ, fs=SR, output="sos"), dry)


dry = scene()
out = record(dry)
file_out(out)
```